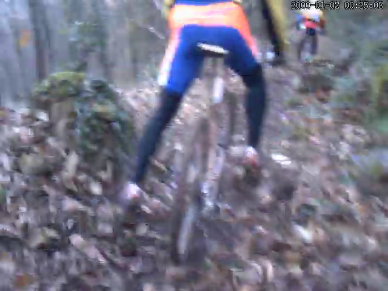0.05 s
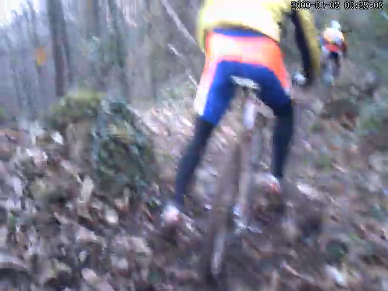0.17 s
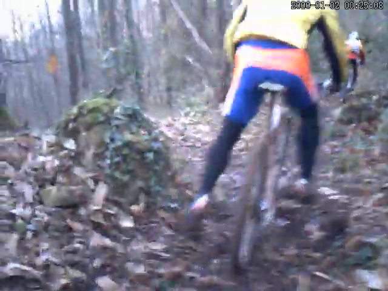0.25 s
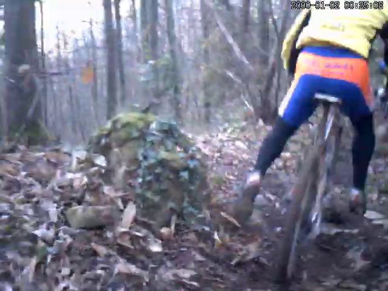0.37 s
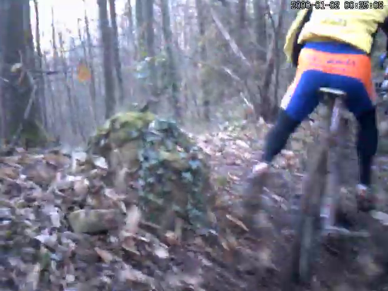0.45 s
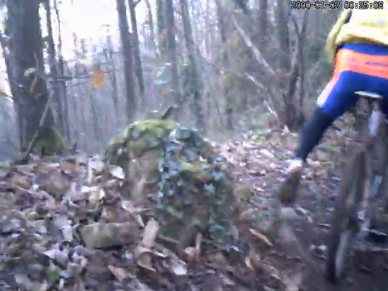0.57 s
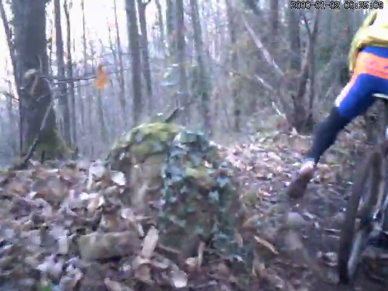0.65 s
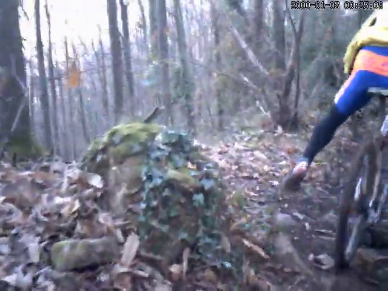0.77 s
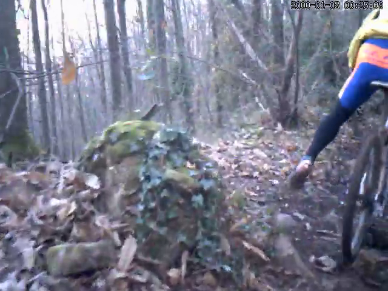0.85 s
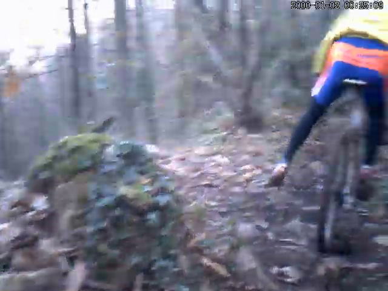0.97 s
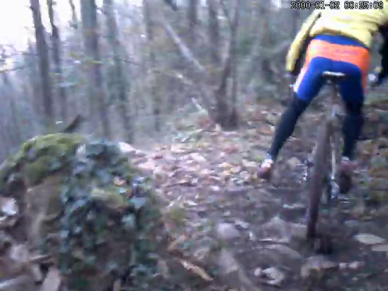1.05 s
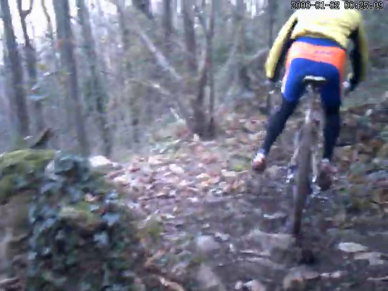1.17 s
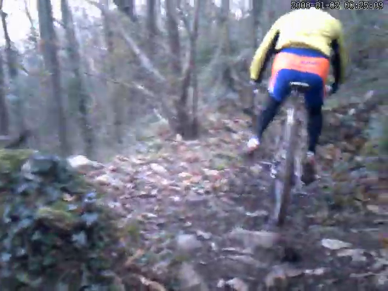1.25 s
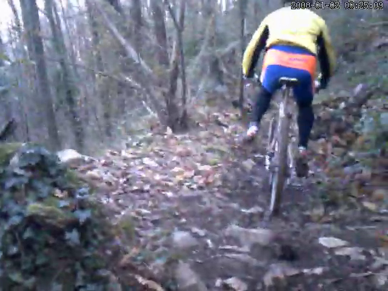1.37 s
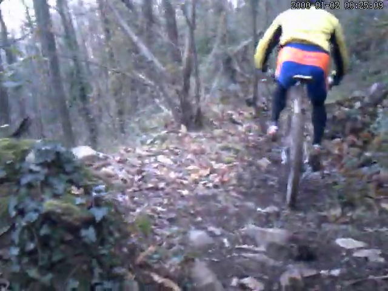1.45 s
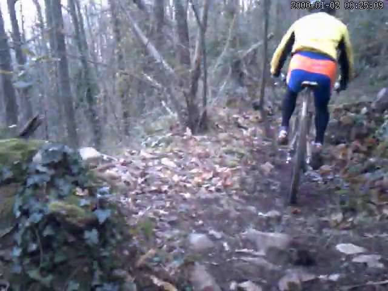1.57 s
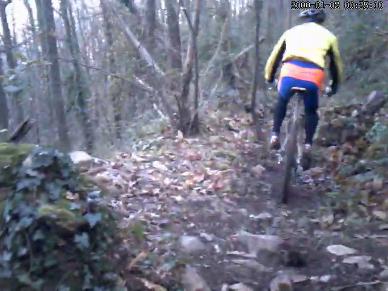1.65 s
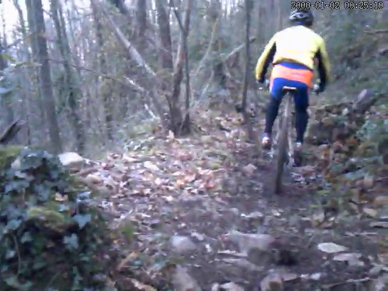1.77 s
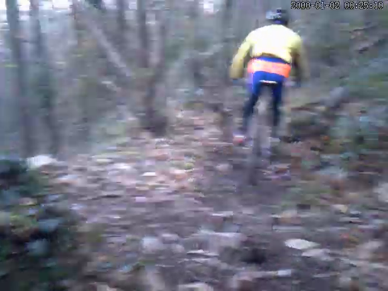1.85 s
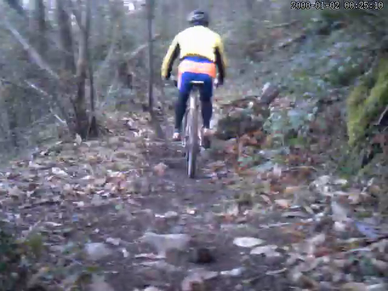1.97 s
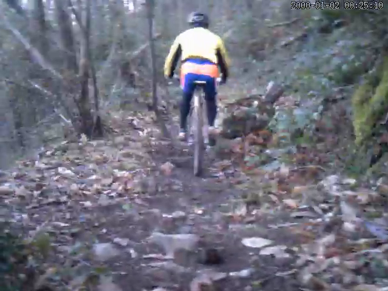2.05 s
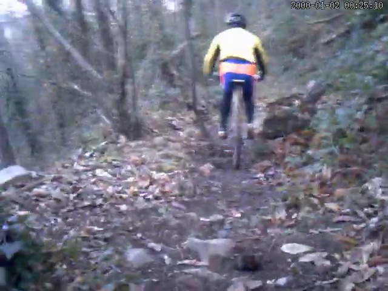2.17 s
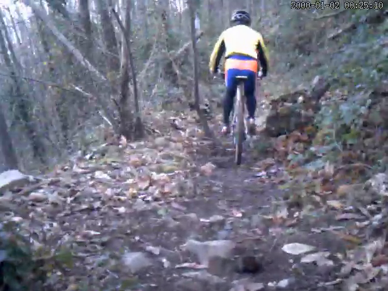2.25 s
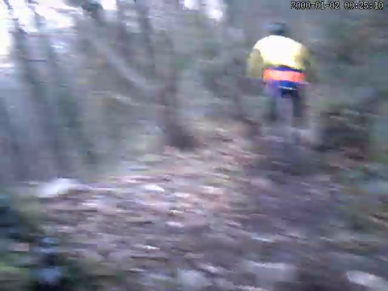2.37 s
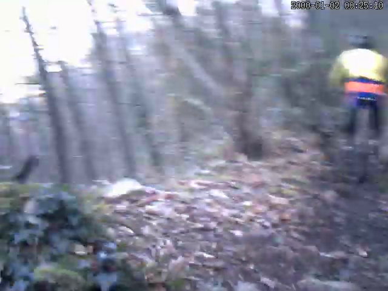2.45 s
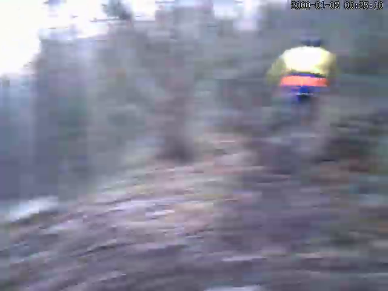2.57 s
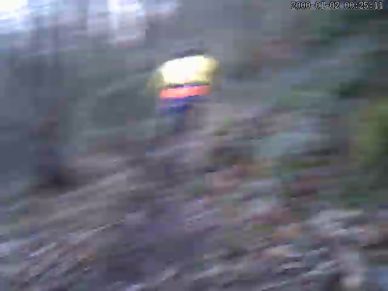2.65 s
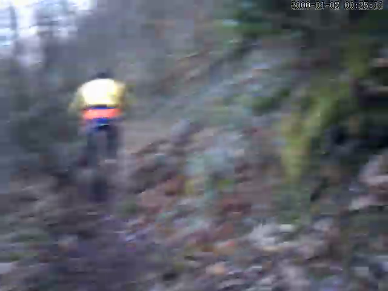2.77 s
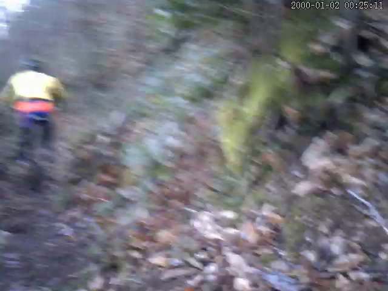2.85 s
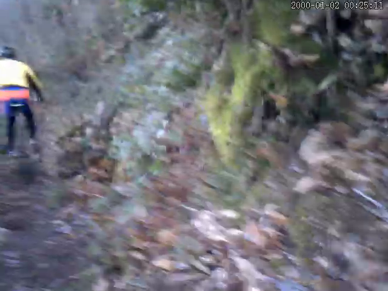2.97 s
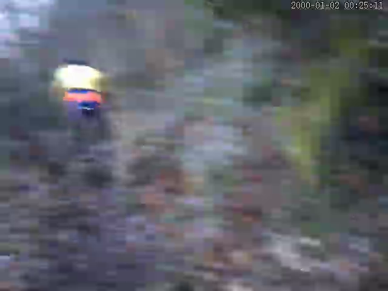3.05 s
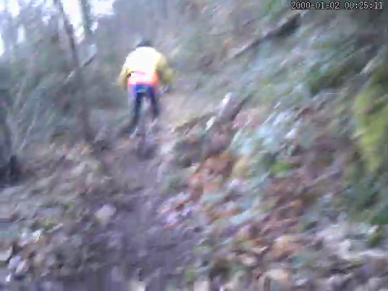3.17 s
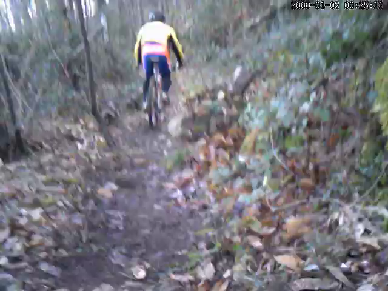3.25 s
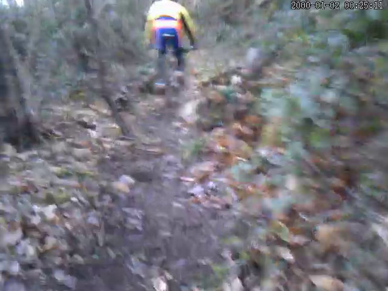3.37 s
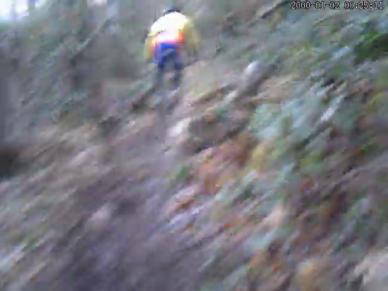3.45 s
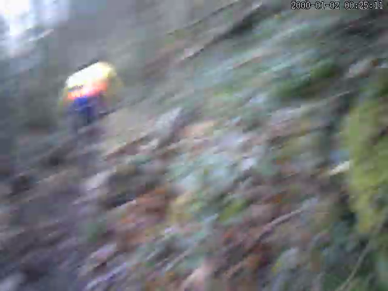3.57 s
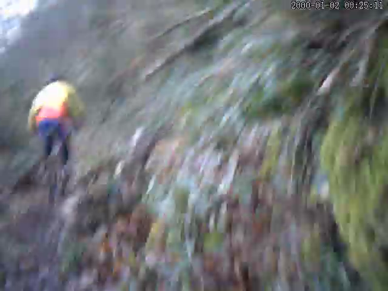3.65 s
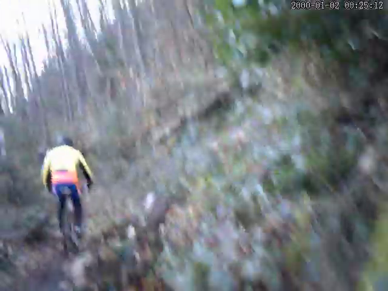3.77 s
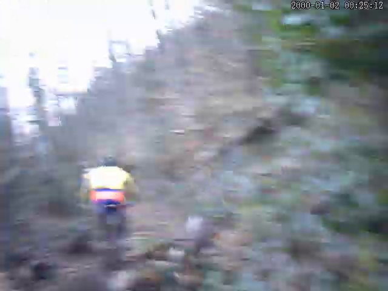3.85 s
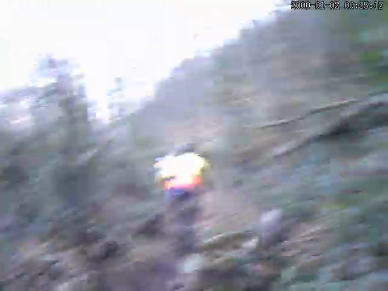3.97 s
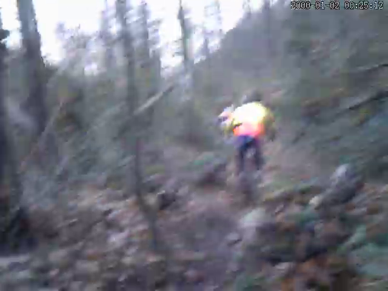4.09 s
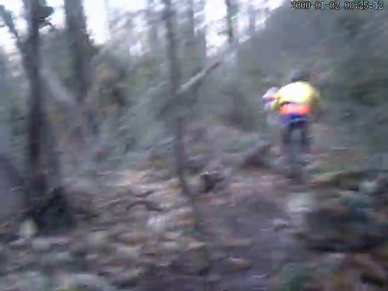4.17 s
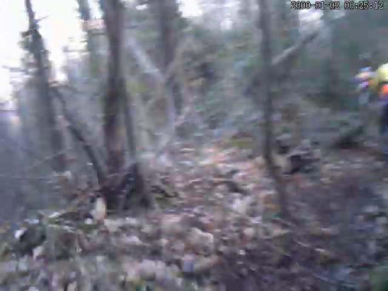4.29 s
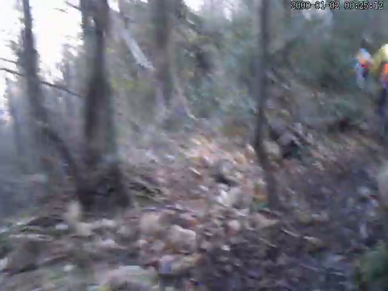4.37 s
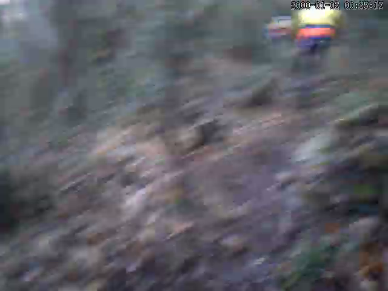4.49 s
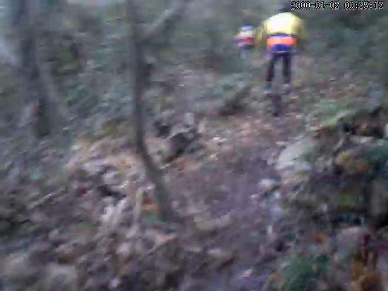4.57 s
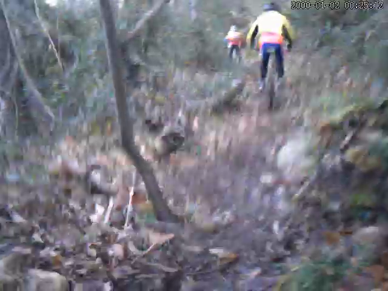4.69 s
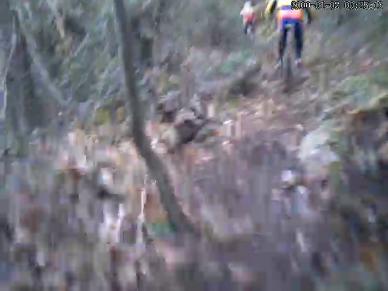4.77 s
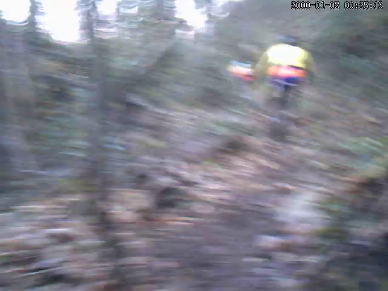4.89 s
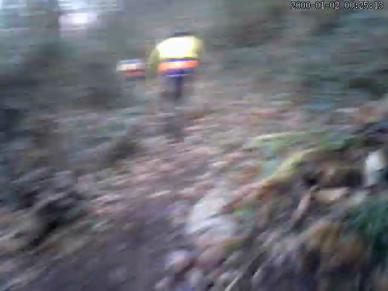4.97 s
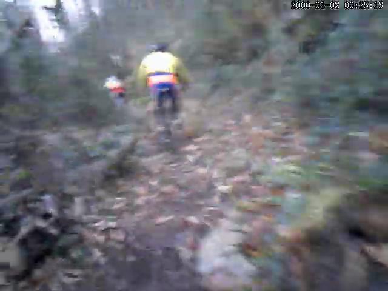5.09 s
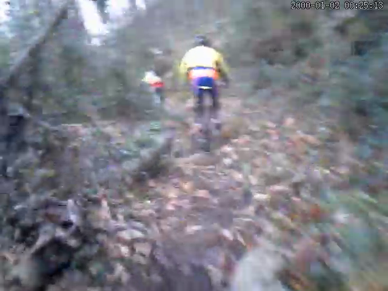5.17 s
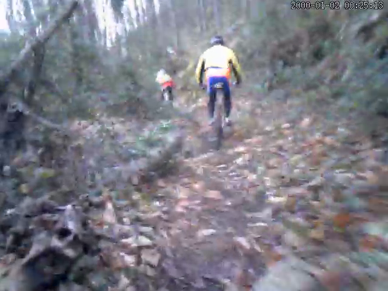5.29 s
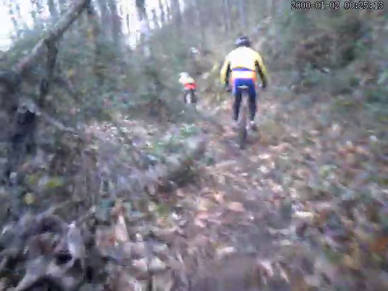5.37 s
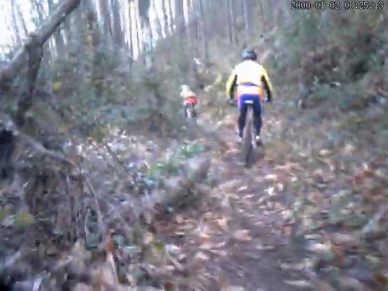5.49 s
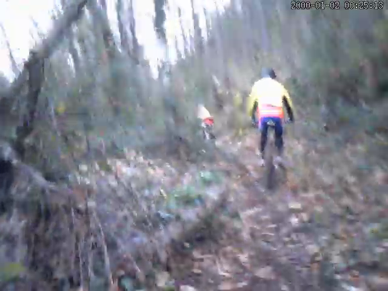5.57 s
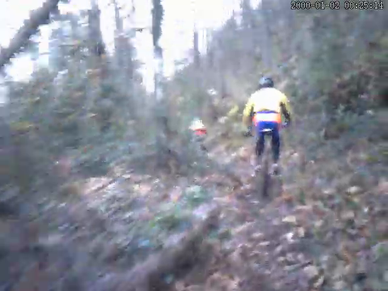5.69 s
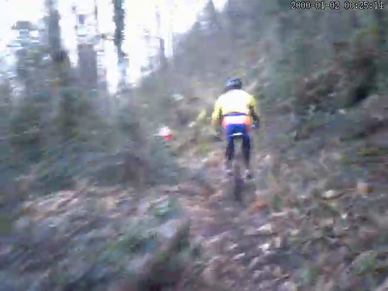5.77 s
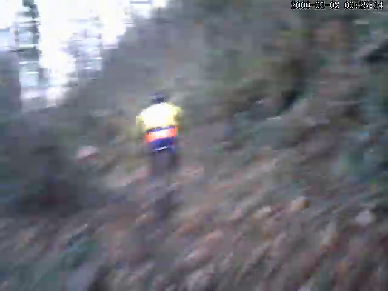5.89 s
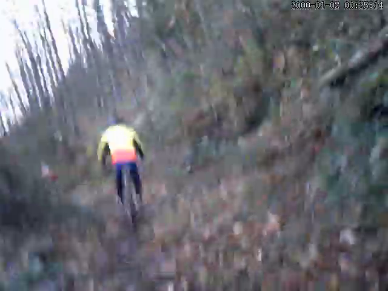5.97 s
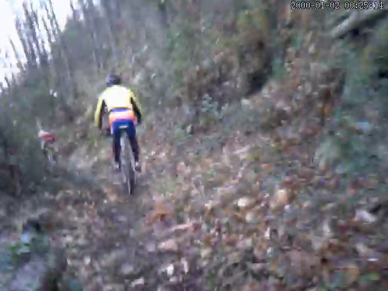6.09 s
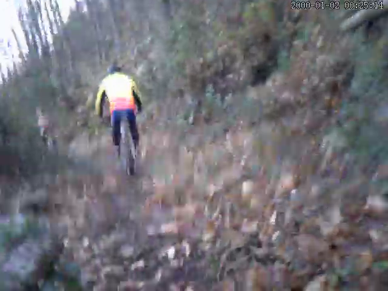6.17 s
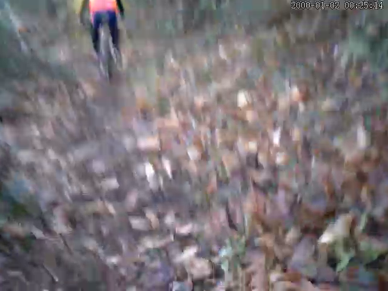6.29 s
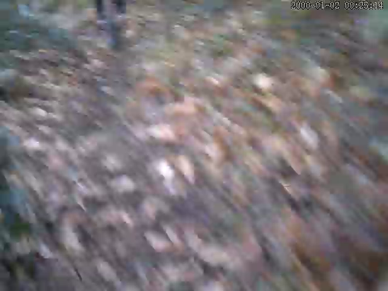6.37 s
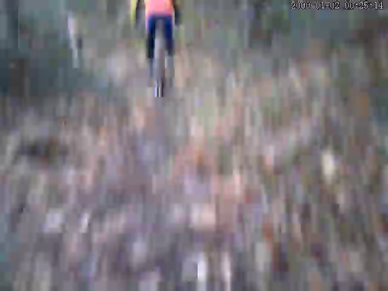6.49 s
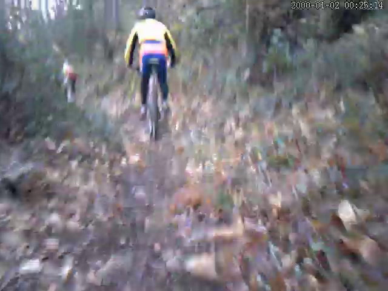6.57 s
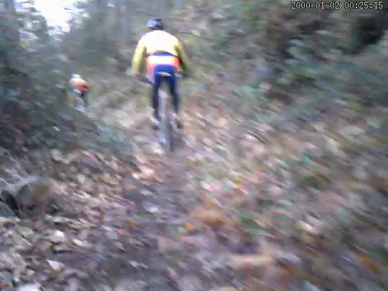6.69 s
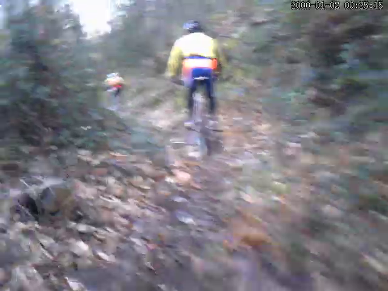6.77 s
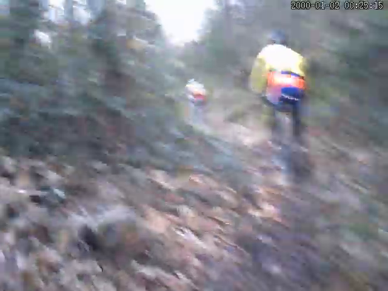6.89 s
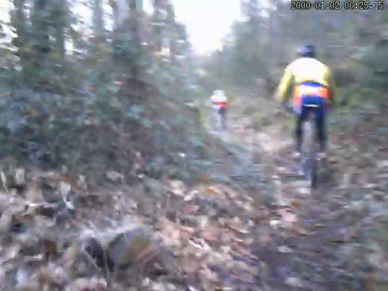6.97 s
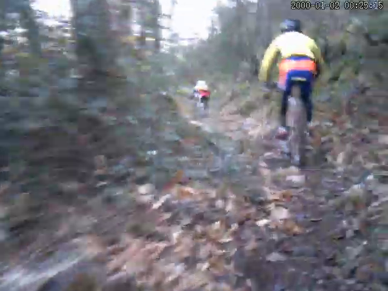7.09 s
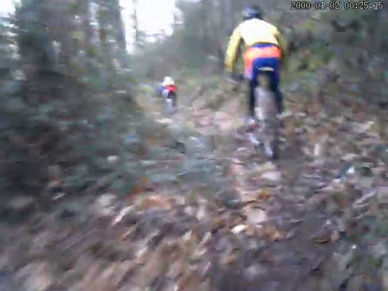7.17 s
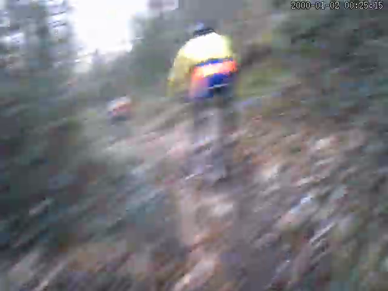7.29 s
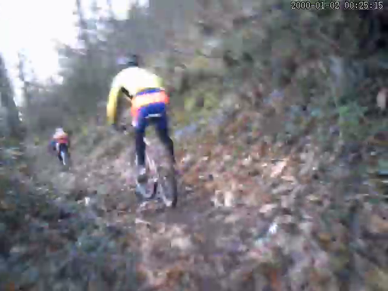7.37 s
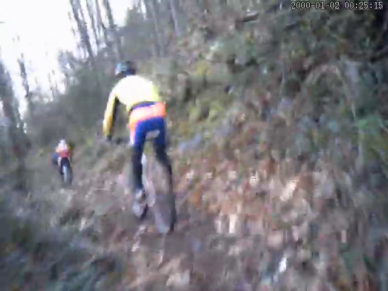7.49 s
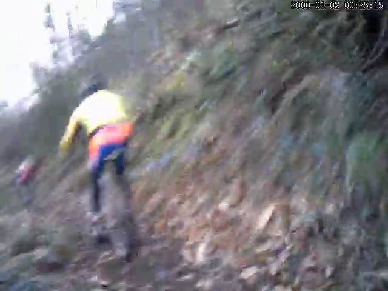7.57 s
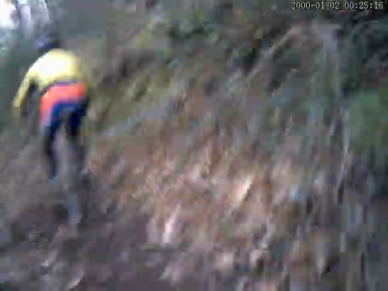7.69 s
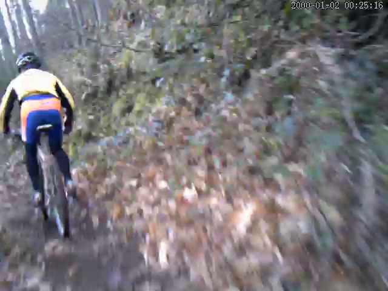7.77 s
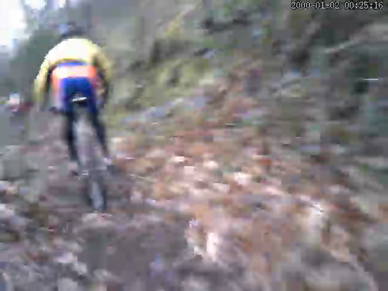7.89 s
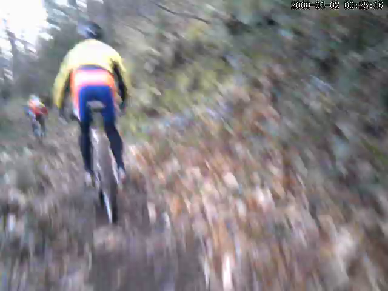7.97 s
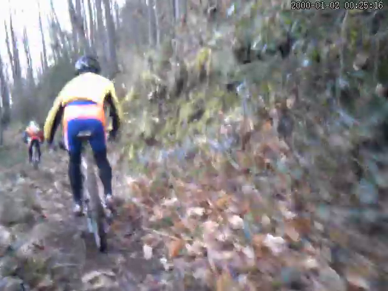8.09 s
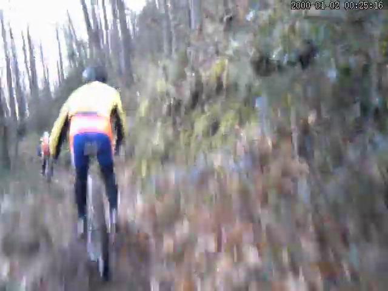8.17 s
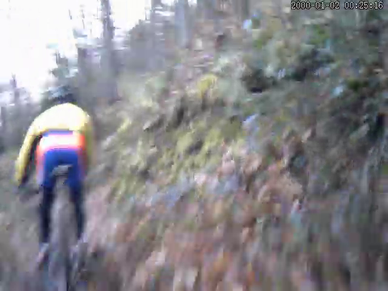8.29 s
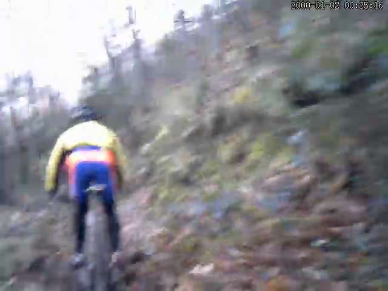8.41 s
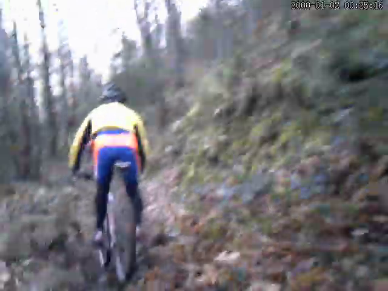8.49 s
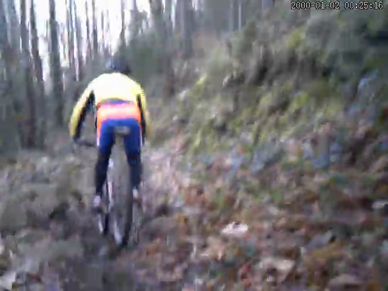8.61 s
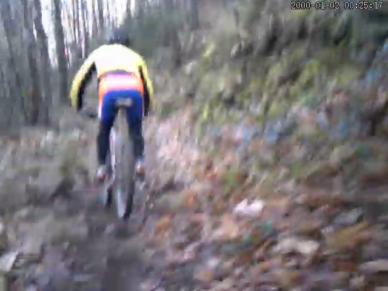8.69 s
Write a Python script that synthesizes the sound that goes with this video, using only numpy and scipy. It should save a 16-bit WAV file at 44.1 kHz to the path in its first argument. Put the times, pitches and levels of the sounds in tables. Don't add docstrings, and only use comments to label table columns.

```python
import sys
import numpy as np
from scipy import signal
from scipy.fft import rfft, irfft
from scipy.io import wavfile
from scipy.ndimage import uniform_filter1d

SR = 44100
rng = np.random.default_rng(int(sys.argv[2]) if len(sys.argv) > 2 else 0)


def generate_wav(sig):
    pcm = np.round(np.clip(np.atleast_2d(sig).T, -1, 1) * 32767).astype(np.int16)
    wavfile.write(sys.argv[1], SR, pcm)


def convert_level_to_amplitude(level_db):
    exponent = np.asarray(level_db, float) / 20
    return 10 ** exponent


N = 385434

RAIL = 0.705
# centre in Hz, width in Hz, level in dB.
FRAME_MODES = [(240, 20.9, 11), (400, 87.5, 6), (500, 26, 3.5), (586.4, 18, 6.5), (915, 50, 2.5),
               (1393, 156, -6), (2130, 130, -45.5), (3000, 170, -41)]


def curve(table):
    return np.interp(np.arange(N) / SR, *np.transpose(table))


def walk(rate):
    hold = int(SR / rate)
    levels = np.repeat(rng.standard_normal(N // hold + 1), hold)
    slewed = uniform_filter1d(uniform_filter1d(levels, hold), hold)
    return 2.0 * slewed[:N]


def unit(x):
    return x / np.sqrt(np.mean(x ** 2))


def coloured(x, spectrum):
    hz, db = np.transpose(spectrum)
    bins = np.arange(len(x) // 2 + 1) * SR / len(x) + 1
    gain = convert_level_to_amplitude(np.interp(np.log(bins), np.log(hz), db))
    return unit(irfft(rfft(x) * gain, len(x)))


def add(out, s, piece):
    i = int(s * SR)
    out[i:i + len(piece)] += piece[:N - i]


def gusts():
    # start in seconds, length in seconds, lift in dB.
    gust_rows = [(0.096, 0.05, 12), (0.274, 0.044, 5.5), (0.401, 0.056, 13), (0.636, 0.025, 13),
                 (0.814, 0.024, 17), (0.885, 0.065, 6), (2.849, 0.034, 14.5), (2.892, 0.021, 9),
                 (2.944, 0.036, 10), (3.046, 0.04, 7.5), (3.099, 0.052, 9.5), (3.259, 0.037, 13),
                 (3.54, 0.053, 25), (3.625, 0.058, 24.5), (3.69, 0.058, 12), (3.963, 0.075, 9),
                 (4.06, 0.089, 15), (4.182, .05, 13.5), (4.552, .01, 5), (4.611, .02, 7),
                 (4.684, 0.028, 10.5), (4.794, 0.058, 11), (4.976, 0.017, 9.5), (5.013, .1, 12),
                 (5.131, .03, 12), (5.181, 0.1, 11), (5.307, 0.017, 8.5), (5.332, 0.049, 13),
                 (5.41, 0.019, 7), (5.483, 0.023, 12), (5.563, .045, 11), (5.789, 0.056, 16.5),
                 (5.863, 0.02, 11), (5.982, .085, 14.5), (6.081, 0.21, 16), (6.305, 0.05, 15),
                 (6.494, 0.13, 18), (6.612, .04, 11), (6.686, 0.061, 10), (6.769, 0.088, 11),
                 (6.861, 0.062, 10), (6.969, 0.072, 10.5), (7.045, .025, 7), (7.187, 0.072, 10.5),
                 (7.282, 0.026, 12.5), (7.345, 0.011, 8.5), (7.382, 0.041, 8.5), (7.465, 0.1, 11.5),
                 (7.585, 0.039, 13.5), (7.643, 0.064, 13.5), (7.73, 0.084, 11), (7.841, 0.077, 9.5),
                 (7.966, .035, 15), (8.007, 0.023, 8), (8.071, 0.014, 10), (8.215, 0.059, 9),
                 (8.287, 0.044, 13), (8.399, 0.19, 10), (8.614, 0.051, 11.5)]
    rise_s, fall_s = 0.008, 0.018
    t = np.arange(N) / SR
    lift_db = np.zeros(N)
    for s, length, db in gust_rows:
        corners = [s - rise_s, s, s + length, s + length + fall_s]
        lift_db += np.interp(t, corners, [0, db, db, 0])
    return lift_db


def wind(rumble_db, buffet_db):
    # frequency in Hz, level in dB per Hz.
    rumble_spectrum = [(8, -14.5), (25, 0.5), (60, 2.5), (110, 3.5), (200, -15.5), (400, -30),
                       (4000, -83.5)]
    # frequency in Hz, level in dB.
    buffet_spectrum = [(40, -12), (100, -11.5), (150, -1), (250, 1.5), (400, -8.5), (800, -13.5),
                       (1600, -52), (4000, -55)]
    ragged = 0.6 * walk(22)
    eddies = rng.standard_normal(N) * (0.012 + (rng.random(N) < 150 / SR))
    rumble = coloured(rng.standard_normal(N), rumble_spectrum)
    rumble = unit(rumble * convert_level_to_amplitude(2.5 * ragged + 0.38 * walk(35)))
    buffet = unit(coloured(eddies, buffet_spectrum) * convert_level_to_amplitude(2.2 * ragged + 2.4 * walk(70)))
    return convert_level_to_amplitude(rumble_db + 6) * rumble + convert_level_to_amplitude(buffet_db) * buffet


def slaps():
    # start in
    # seconds, peak in dB, swing in Hz.
    slap_rows = [(0.084, -13, 107), (.105, 0.5, 400), (0.139, -7.5, 246), (.173, -4, 329),
                 (0.267, -11, 204), (.278, 3.5, 281), (.429, -7, 240), (0.351, -16, 171), (0.406, -12, 257),
                 (0.647, -20, 62), (0.821, -0.5, 241), (0.885, -7, 332), (0.925, -10.5, 215),
                 (1.0355, 0, 500), (1.048, -7, 400), (1.222, -7.5, 400), (1.364, -8, 487), (1.375, -8, 483),
                 (1.1, -13, 241), (8.215, 8, 240), (2.856, -13.5, 68), (2.896, -11.5, 62.7),
                 (2.938, -10, 180), (2.951, -10, 170), (3.103, -9, 288), (3.132, -16, 220),
                 (3.262, -0.5, 240), (3.353, -9.5, 250), (3.5339, 6.5, 169.6), (3.58, -7, 253),
                 (3.569, 2, 302), (3.91, -8, 135), (3.96, -7, 105), (4.082, -2.5, 110), (4.091, -1, 221),
                 (4.111, 4.5, 188.6), (4.127, -2, 223), (4.161, -3, 110.2), (4.185, -7, 159.5),
                 (4.197, -3.5, 155), (4.221, -7, 125.6), (4.544, -4.5, 255), (5.008, -1.5, 129),
                 (5.47, -1.5, 242.4), (5.565, 1, 258.6), (5.654, -8.5, 130), (5.685, -7.5, 150),
                 (5.746, -9.5, 120), (5.895, -9, 180), (6.422, -7, 170.4), (6.781, -4, 200),
                 (6.823, -5, 219.5), (6.87, -4, 220), (7.895, -4.5, 200), (7.915, -5, 200),
                 (8.52, -3, 170.4), (8.657, -3, 170), (8.718, -9.5, 139), (6.978, 0.5, 252),
                 (7.287, -5, 150.4), (7.752, -1, 154), (7.955, -3, 268), (8.418, -4.5, 135),
                 (8.618, -1.5, 137.5), (7.384, 10, 295)]
    out, t = np.zeros(N), np.arange(SR // 12) / SR
    for s, db, hz in slap_rows:
        fade = np.exp(-t * hz / 0.6) * (1 - np.exp(-t / 0.0008))
        add(out, s, -convert_level_to_amplitude(db + 9) * np.sin(2 * np.pi * hz * t) * fade)
    return out


def smacks():
    # centre in seconds, peak in dB, swing in Hz.
    smack_rows = [(4.632, 1.5, 163), (4.6896, 1, 152), (4.7127, 1.5, 103.3), (4.841, 0.8, 186.5),
                  (5.059, 4, 170), (5.1013, -1.7, 157.3), (5.1423, 2.1, 95.4), (5.1877, 0.5, 118.4),
                  (5.2315, -1, 122.8), (5.3562, 0, 90.4), (5.4181, 2, 164), (5.4976, -1.8, 146.3),
                  (5.5791, -4, 67.6), (5.6059, -1.3, 194), (5.8153, 1.5, 184), (5.8337, 3.7, 169),
                  (5.9985, 0.5, 84.2), (6.0408, 2.2, 108), (6.0612, -4.6, 124), (6.101, 1.2, 83.6),
                  (6.125, 0.5, 148), (6.1722, 1.5, 105.2), (6.1923, 2.3, 217), (6.2252, 4, 113.6),
                  (6.2514, 0, 209), (6.2796, -1, 146), (6.3184, 4, 130), (6.352, 1, 175),
                  (6.5256, 1.2, 173), (6.571, -1.5, 149.7), (6.6302, -2.3, 195), (6.6764, 0, 194.6),
                  (6.716, 1.3, 68.2), (6.738, 2, 168.4), (6.9198, 2, 145.3), (6.9944, -0.1, 118),
                  (7.019, -0.5, 178), (7.0658, -0.5, 156.3), (7.1871, 1.8, 203), (7.2066, 1.4, 213),
                  (7.235, -1, 175.5), (7.3022, 2.5, 73), (7.403, 1.3, 137), (7.4818, -2, 138),
                  (7.5359, 0.5, 160), (7.626, 1.9, 91), (7.6669, 1, 85), (7.7667, -0.2, 83.2),
                  (7.8667, 1, 100.5), (7.9866, 2, 151.5), (8.0297, -2.6, 142.5), (8.079, -2.5, 197),
                  (8.295, -1, 129), (8.3211, 3, 118.3), (8.438, -1.5, 162), (8.4597, 2.4, 126.5),
                  (8.4845, -6, 152), (8.5728, -1.1, 167.5), (8.638, -5, 172.4), (8.6695, 0.7, 91.3)]
    lead, tail = 0.3, 0.35
    out, t = np.zeros(N), np.arange(-SR // 50, SR // 50) / SR
    for s, db, hz in smack_rows:
        fade = np.exp(-(t * hz / np.where(t < 0, lead, tail)) ** 2)
        add(out, s + t[0], -convert_level_to_amplitude(db + 5.5) * np.sin(2 * np.pi * hz * t) * fade)
    return out


def ring(x, hz, width_hz):
    return signal.lfilter(*signal.iirpeak(hz, hz / width_hz, SR), x)


def frame(x, modes=FRAME_MODES):
    return sum((-1) ** k * convert_level_to_amplitude(db) * ring(x, hz, width) for k, (hz, width, db) in enumerate(modes))


def knock_rows():
    # start in seconds, peak in dB, colour in Hz, chatter length in ms.
    blow_rows = [(0.107, -3, 450, 18), (.177, -3.5, 450, 34), (.279, -7, 542, 21), (.809, -7, 597, 84),
                 (1.036, -9.5, 1293, 6.4), (1.04, 0.5, 858, 18), (1.659, -6, 878, 58),
                 (1.754, -9.5, 543, 20), (1.765, -11, 500, 24), (3.058, -7, 850, 11), (3.064, -7, 606, 38),
                 (3.503, -6.5, 616, 22), (3.537, 15.5, 740, 15), (3.624, 10.5, 565, 6.1),
                 (3.785, 7.5, 603, 26), (4.0993, 4, 1008, 5.8), (4.577, 1, 558, 16), (4.788, 3, 500, 13),
                 (5.04, -10.5, 450, 40), (5.799, 17.5, 582, 36), (5.988, -3, 544, 84),
                 (6.119, 5.5, 550, 12), (6.218, -4.5, 813, 55), (6.49, 4, 850, 76), (6.6, 6.5, 560, 44),
                 (6.902, -0.5, 638, 100), (7.233, -1.5, 414, 30), (7.352, 5, 729, 29),
                 (7.582, 8.5, 776, 16), (7.649, 4.5, 581, 58), (7.989, 7.5, 572, 8.5), (8.285, 3, 650, 20)]
    # start in seconds, peak in dB, colour in Hz, crack against the peak in dB.
    tick_rows = [(0.328, -8.5, 720, -23), (0.435, -5.5, 830, -20), (0.511, -20.5, 864, 1),
                 (1.229, -8.5, 1330, -5), (1.72, -19.5, 900, -1), (1.856, -19, 895, 3),
                 (1.377, -8.5, 920, -5), (2.136, -18.5, 1090, 1), (2.977, -9, 880, -22),
                 (3.023, -14, 1360, -21), (3.672, 13.5, 580, -4.5), (4.1693, 6.5, 900, -1.5),
                 (4.312, -6, 1310, -21), (4.415, -6.5, 1330, -31), (4.895, -4.5, 760, -5),
                 (4.944, -4.5, 605, -16), (4.975, 1, 810, -21), (5.439, -6, 860, -12.5),
                 (5.693, -5.5, 850, -5), (5.861, -5, 880, -7), (5.939, -3.5, 800, -4.5),
                 (6.408, -3.5, 600, -22), (7.287, -5, 793, -9.5), (6.531, 4, 600, -10),
                 (4.794, 7.5, 698, -3.5), (5.06, -6, 500, -10.5), (5.242, -0.5, 500, -12.5),
                 (6.184, -2, 500, -9), (6.633, -3.5, 500, -11), (6.675, -5, 500, -10), (6.735, -6, 500, -8),
                 (6.775, -3.5, 500, -9.5), (6.836, -5, 500, -4), (6.894, -3.5, 600, -1.5),
                 (7.206, -7.5, 700, -11.5), (7.399, 1, 596, -8), (7.553, -3.5, 915, -12),
                 (7.561, 5, 900, -10), (7.814, -4, 500, -9), (8.094, -7, 903, -9), (8.261, -5.5, 597, -11),
                 (8.405, -6, 600, -3.5), (7.683, -2, 565, -12.5), (7.702, 2.5, 583, -9),
                 (7.841, -1.5, 618, -5), (8.013, -1, 915, -16.5), (8.35, -5.5, 800, -10),
                 (8.371, -2, 800, -9.5)]
    # start in seconds, peak in dB.
    bump_rows = [(.073, -4.5), (0.175, 1), (0.278, 3.5), (0.682, -4), (.885, -3), (1.654, -6), (2.936, -22),
                 (3.046, -2.5), (3.785, 13.5), (4.459, -6.5), (4.618, -13), (4.685, -11), (5.211, -2.5),
                 (5.244, 2), (5.469, -3), (5.596, -3.5), (6.08, -7), (6.139, 2.5), (6.303, -19),
                 (6.625, -5.5), (6.705, -10.5), (6.781, -10.5), (6.824, -2), (7.012, -5), (7.4, 4.5),
                 (7.515, -1.5), (7.765, -6), (8.096, -5), (8.152, -7), (8.22, 0)]
    blows = [(s, db, db - 14, db - 13, hz, ms) for s, db, hz, ms in blow_rows]
    ticks = [(s, db, db - 32.5, db + crack_db, hz, 14) for s, db, hz, crack_db in tick_rows]
    bumps = [(s, db - 14.5, db, db - 33.5, 650, 36) for s, db in bump_rows]
    return blows + ticks + bumps


def knocks():
    out, t, rows = np.zeros(N), np.arange(SR // 6) / SR, knock_rows()
    noises = rng.standard_normal((len(rows), len(t)))
    for (s, db, thump_db, crack_db, hz, ms), noise in zip(rows, noises):
        fade = np.exp(-np.log(1000) * (t * 1000 / ms) ** 1.5)
        blow = noise * fade * (1 - np.exp(-t / 0.0016))
        body = ring(ring(blow, hz, 0.21 * hz) + convert_level_to_amplitude(-12.5) * frame(blow), hz, 3.3 * hz)
        crack = ring(ring(blow * fade, 2300, 5000), 2300, 5000)
        thump = ring(blow, 245, 24) + convert_level_to_amplitude(4.5) * ring(blow, 410, 35)
        for part, part_db in ((body, db - 3.5), (crack, crack_db - 4.5), (thump, thump_db - 9.5)):
            add(out, s - 0.0015, convert_level_to_amplitude(part_db) * part / abs(part).max())
    return out


def judders():
    # start in seconds, length in seconds, level in dB, colour in Hz.
    judder_rows = [(0.185, 0.063, -32.5, 2670), (0.434, 0.0067, -21, 2630), (3.569, 0.0043, -11, 1980),
                   (3.684, 0.027, -15, 500), (0.679, 0.0027, -19, 3700), (1.037, 0.024, -17, 580),
                   (1.65, 0.0067, -19, 1394), (3.645, 0.014, 0, 500), (3.044, .03, -15, 441),
                   (4.895, 0.0037, -35, 800), (4.974, 0.0047, -18.5, 790), (6.406, 0.0063, -29, 883),
                   (3.548, 0.014, -3.5, 500), (3.62, 0.018, -4, 400), (4.685, 0.026, -11, 159),
                   (4.807, 0.031, -9.5, 245), (5.803, 0.024, -4.5, 650), (6.311, 0.046, -10.5, 225.5),
                   (6.481, 0.073, -8, 608), (6.698, 0.074, -12, 249.5), (6.983, 0.038, -6.5, 221),
                   (7.54, 0.031, -14.5, 840), (8.019, 0.0057, -7.5, 913), (8.296, 0.031, -17.5, 282)]
    out, t = np.zeros(N), np.arange(SR // 8) / SR
    noises = rng.standard_normal((len(judder_rows), len(t)))
    for (s, length, db, hz), noise in zip(judder_rows, noises):
        hold = np.clip(t / 0.0015, 0, 1) * np.clip((length - t) / 0.014 + 0.5, 0, 1)
        shake = unit(ring(ring(noise, hz, 0.98 * hz), hz, hz))
        add(out, s, convert_level_to_amplitude(db) * shake * hold)
    return out


def sings():
    # start in seconds, level in dB, pitch in Hz, 60 dB decay time in seconds.
    sing_rows = [
        (0.684, -6, 283, 0.1),
        (1.426, -18, 254, 0.13),
        (1.6, -40, 374, 0.22),
        (1.655, -17.5, 234.6, 0.19),
        (1.6503, 8, 419, 0.049),
        (1.77, -18, 593, .15),
        (1.789, -29, 495, 1.55),
    ]
    out, t = np.zeros(N), np.arange(SR // 2) / SR
    noises = rng.standard_normal((len(sing_rows), len(t)))
    for (s, db, hz, t60), noise in zip(sing_rows, noises):
        tone = np.sin(2 * np.pi * hz * t) + 0.5 * unit(ring(noise, hz, 60))
        add(out, s, convert_level_to_amplitude(db) * tone * np.exp(-np.log(1000) * t / t60))
    return out


def rattle(hum_db, rattle_db):
    chance = rng.random((3, N))
    struck = chance[0] < 2500 / SR
    ticks = struck * np.sign(chance[1] - 0.5) * convert_level_to_amplitude(-3 * np.log(chance[2] + 0.004))
    shake = ticks * convert_level_to_amplitude(1.2 * walk(30))
    tubes = unit(frame(shake, FRAME_MODES[:4]))
    small_parts = frame(shake, FRAME_MODES[4:]) * convert_level_to_amplitude(1.6 * walk(12))
    parts = unit(small_parts + convert_level_to_amplitude(-18) * ring(shake, 1400, 3000))
    return convert_level_to_amplitude(hum_db) * tubes + convert_level_to_amplitude(rattle_db - 0.5) * parts


def scene():
    # time in seconds, level in dB.
    airflow = [(0, -47.5), (.3, -25.5), (.6, -40.5), (1, -26), (1.4, -35), (1.6, -56.5), (2.05, -47.5),
               (2.45, -35.5), (2.8, -36), (3.4, -30), (3.9, -27), (4.35, -26), (4.6, -20), (5.9, -19),
               (6.4, -20.5), (7.1, -18.5), (8.74, -18)]
    # time in seconds, level in dB.
    roughness = [(0, -38), (.2, -30), (.6, -37.5), (.85, -28.5), (1.1, -28.5), (1.5, -39.5), (2.11, -43),
                 (2.15, -34), (2.66, -32.5), (2.8, -42), (3.3, -31.5), (4.2, -33), (4.7, -27), (5.9, -28.5),
                 (6.6, -26.5), (7.1, -28.5), (7.7, -23.5), (8.74, -31)]
    air_db, lift_db, rough_db = curve(airflow), gusts(), curve(roughness)
    blown = wind(air_db - 6 + 0.54 * lift_db, air_db + lift_db)
    pivot_db = -37.5
    hum_db = pivot_db + 1.4223 * (rough_db - pivot_db) + 1.5 + 0.19 * lift_db
    shaken = rattle(hum_db, rough_db + 0.23 * lift_db)
    return (blown + slaps() + smacks() + sings() + judders() + shaken + knocks())[None]


def block(x):
    # start in seconds, length in seconds.
    block_rows = [(4.162, .004), (4.2312, .004), (4.801, 0.0061), (5.456, .012), (5.5495, .016),
                  (5.992, 0.0043), (6.0014, 0.0037), (6.103, .006), (6.112, .007), (6.1755, 0.0093),
                  (6.196, 0.003), (6.6, .0112), (7.069, 0.0063), (7.186, .0064), (7.2707, 0.0117),
                  (7.3673, 0.0224), (7.4967, 0.0084), (7.6164, 0.0064), (7.6283, 0.021), (7.668, 0.0039),
                  (7.736, 0.0056), (7.8765, 0.0036), (7.9947, 0.017), (8.2685, 0.0068)]
    pin_s, fall_s, creep_s = 0.003, 0.0013, 0.0015
    y = x.copy()
    fall = np.arange(int(pin_s * SR)) / SR
    for s, length in block_rows:
        i, t = int(s * SR), np.arange(int(length * SR)) / SR
        y[i - len(fall):i] += np.clip(fall / fall_s, 0, 1) * (-1 - y[i - len(fall):i])
        gain = np.maximum(convert_level_to_amplitude(-26.5), 1 + (t - length) / 0.0012)
        y[i:i + len(t)] = gain * x[i:i + len(t)] - RAIL * np.exp(-t / creep_s)
    return y


def top_cut(x):
    return signal.sosfilt(signal.butter(12, 16000, fs=SR, output="sos"), x)


def record(dry):
    # frequency in Hz, level in dB.
    hiss_spectrum = [(20, 2), (200, 3.5), (1000, -7), (2000, -10), (3400, -12.5), (4200, -4.5)]
    camera_sr, offset = 8000, -0.063
    hiss = convert_level_to_amplitude(-29) * coloured(rng.standard_normal(N), hiss_spectrum)
    x = block(dry[0]) + hiss + offset
    low = np.clip(signal.resample_poly(x, 80, 441), -RAIL, RAIL)
    edge = signal.firwin(441 * 32 + 1, camera_sr / 2, window=("kaiser", 9), fs=camera_sr * 441)
    y = signal.resample_poly(low, 441, 80, window=edge)[:N]
    y = np.clip(y, -1.003 * RAIL, 1.003 * RAIL)
    return top_cut(y[None])


dry = scene()
out = record(dry)
generate_wav(out)
```